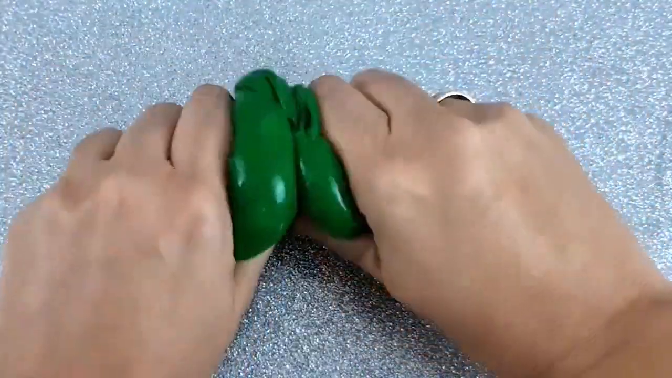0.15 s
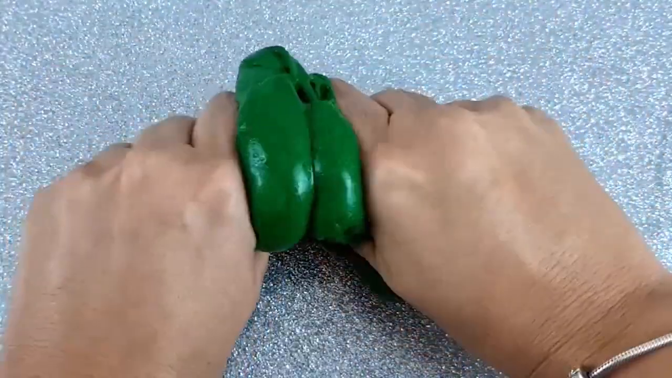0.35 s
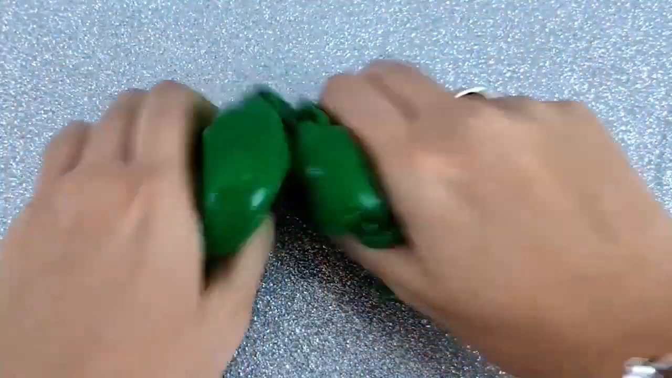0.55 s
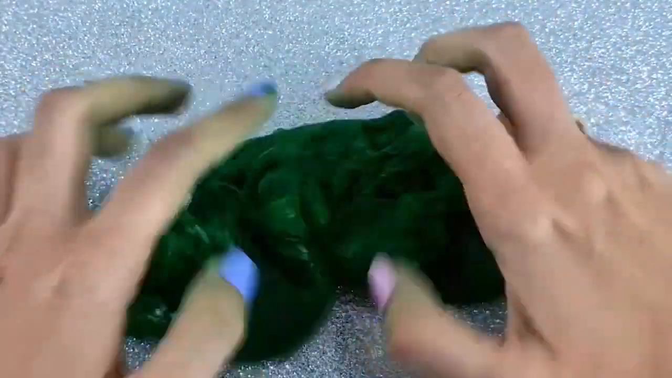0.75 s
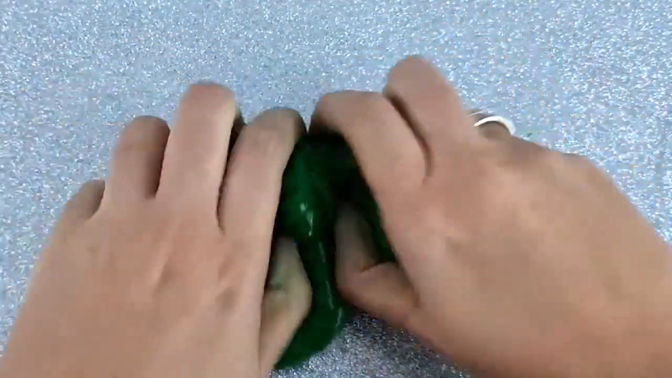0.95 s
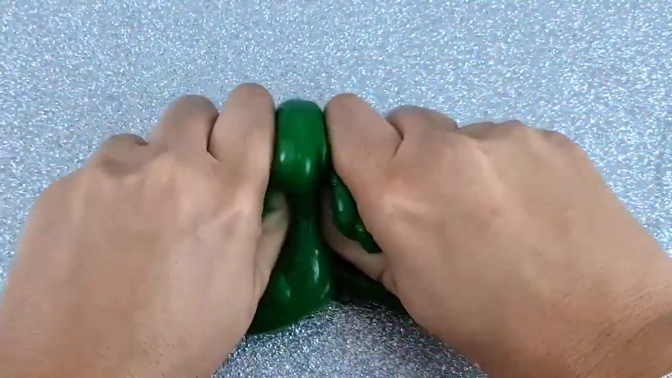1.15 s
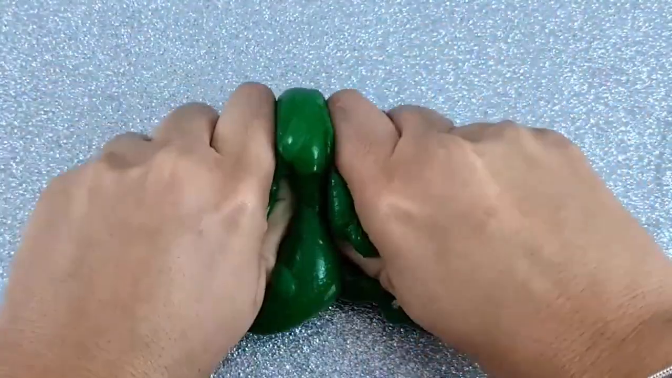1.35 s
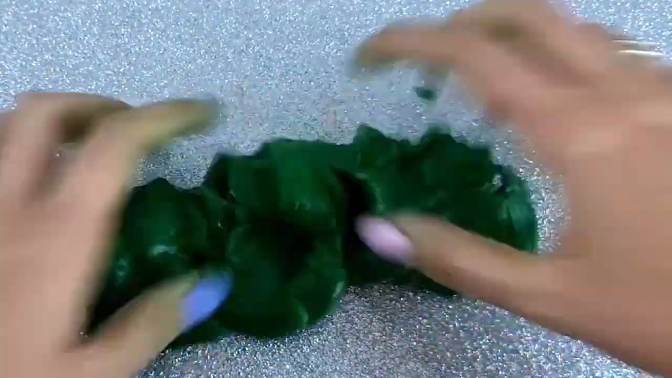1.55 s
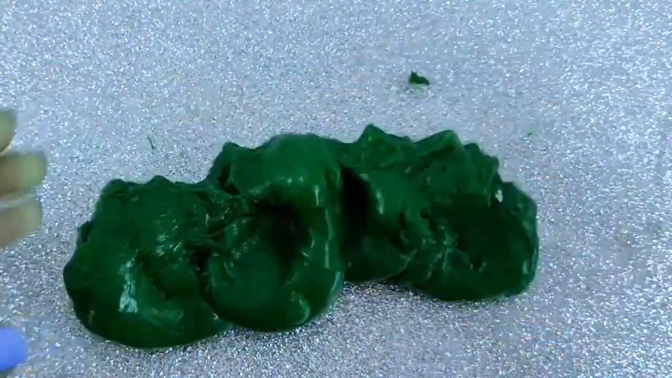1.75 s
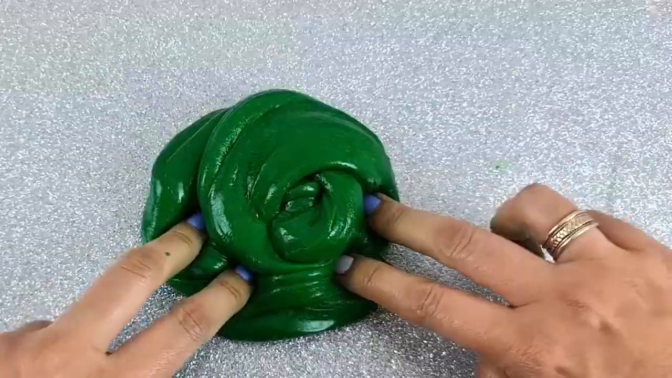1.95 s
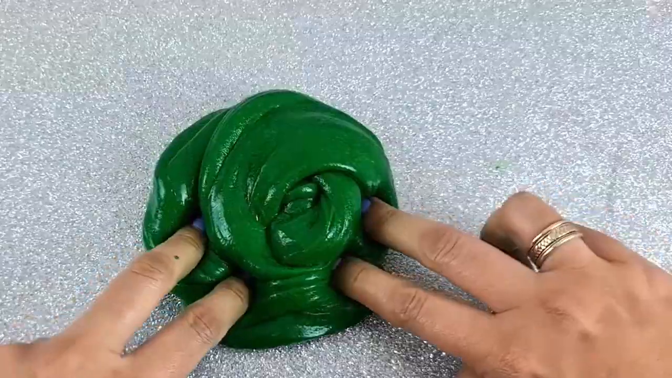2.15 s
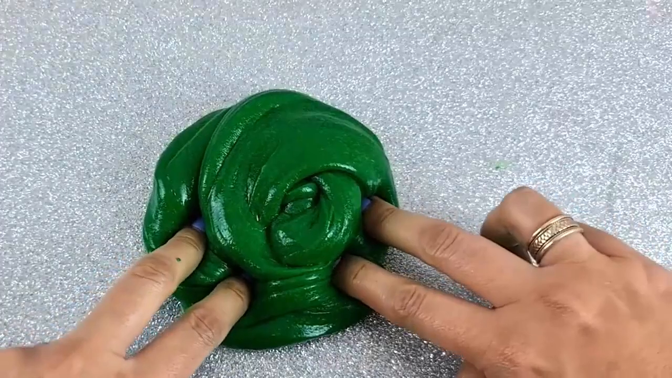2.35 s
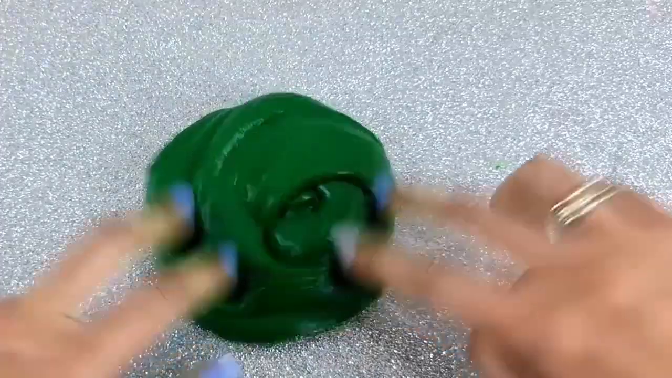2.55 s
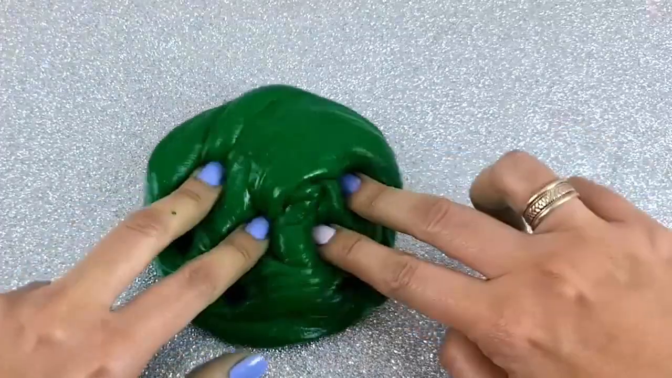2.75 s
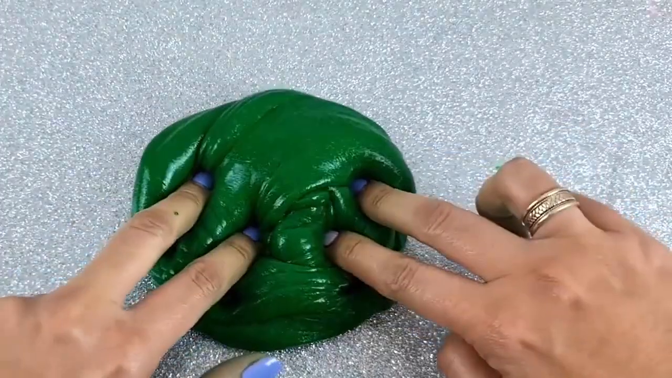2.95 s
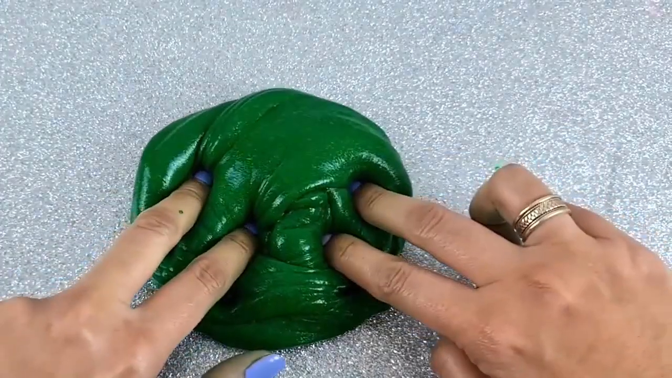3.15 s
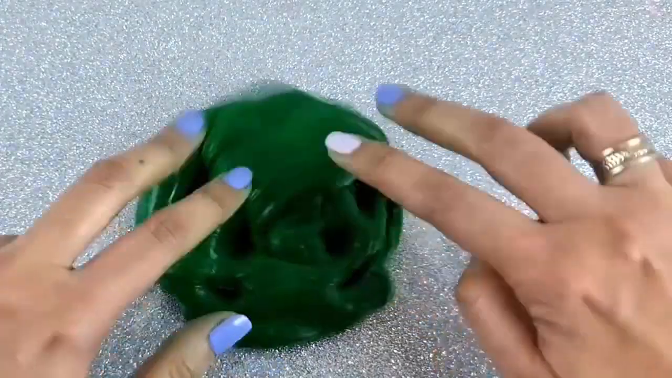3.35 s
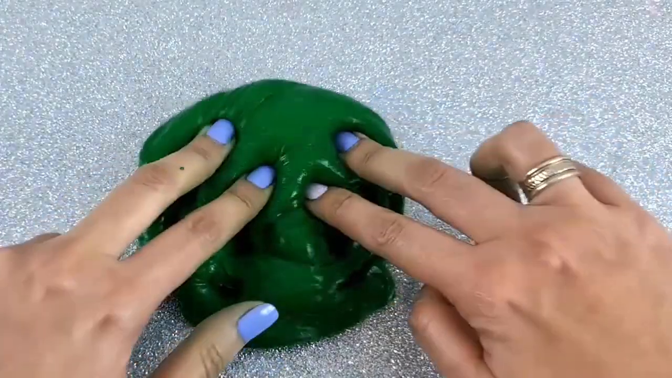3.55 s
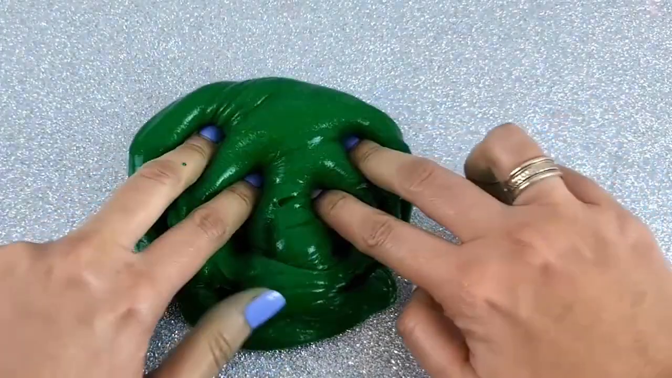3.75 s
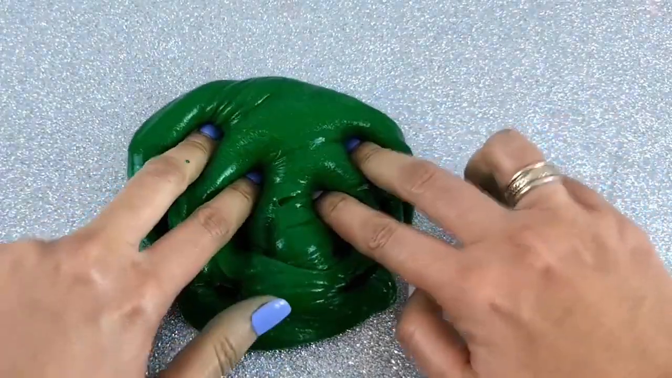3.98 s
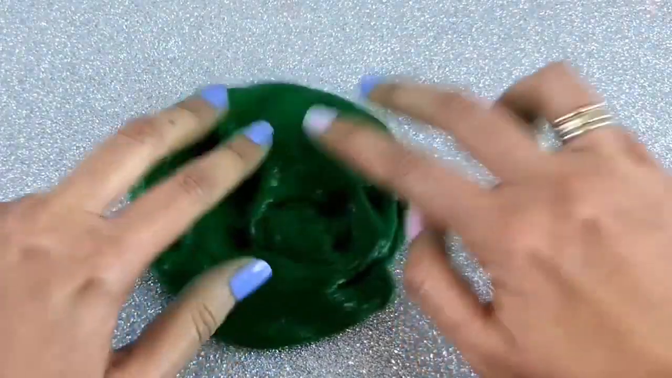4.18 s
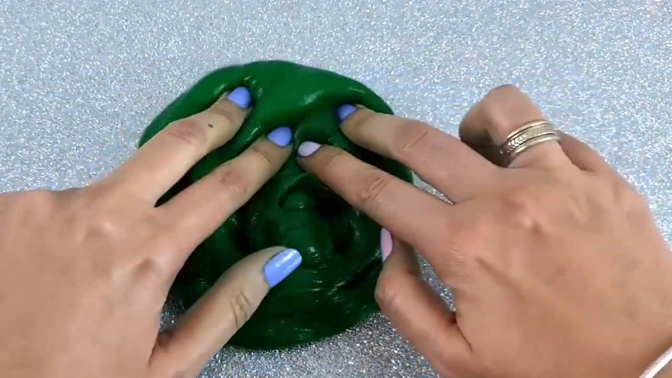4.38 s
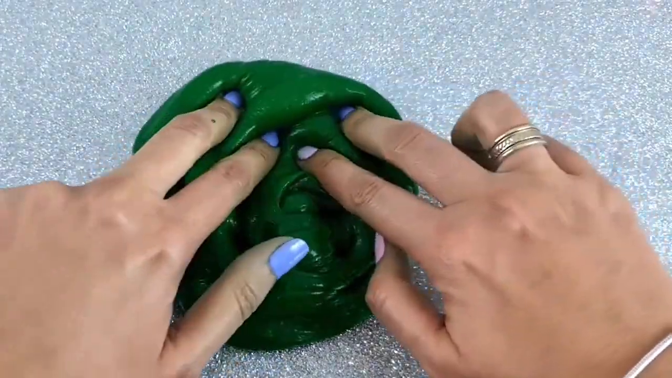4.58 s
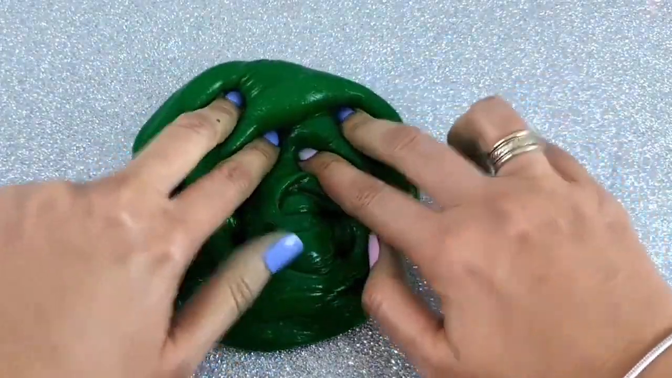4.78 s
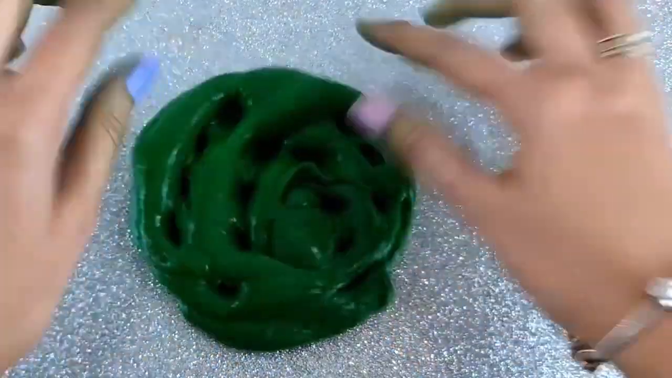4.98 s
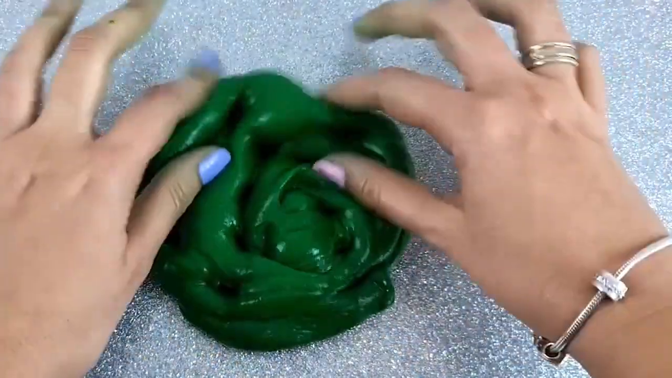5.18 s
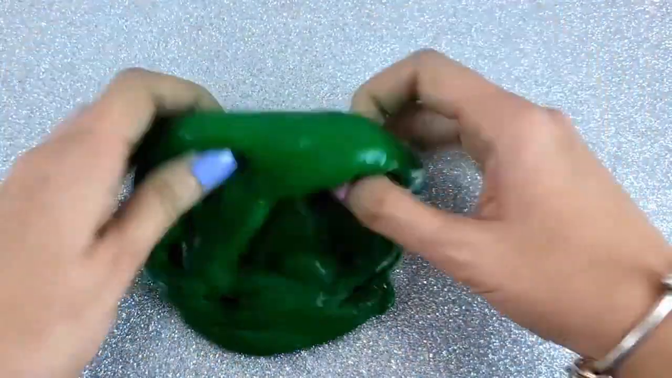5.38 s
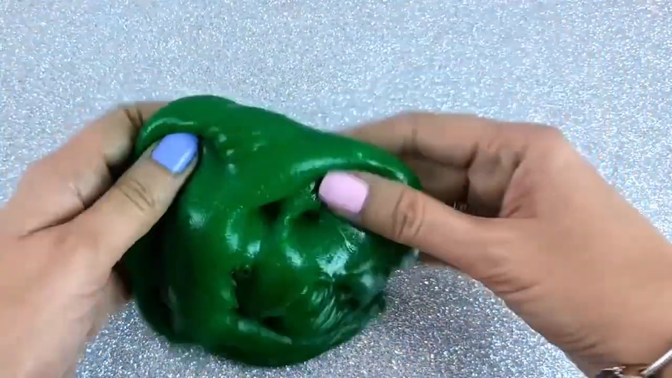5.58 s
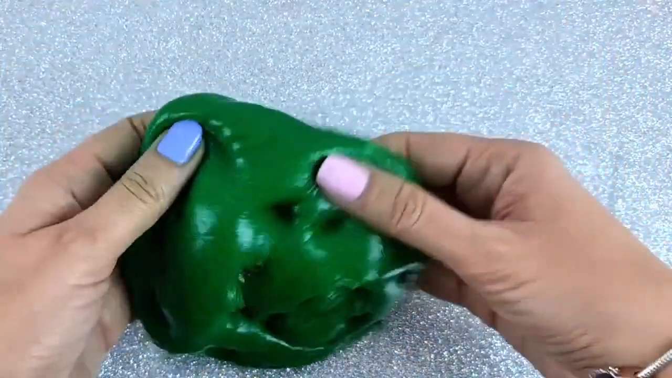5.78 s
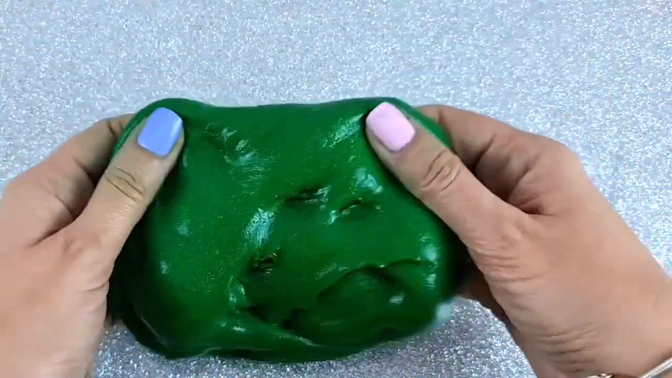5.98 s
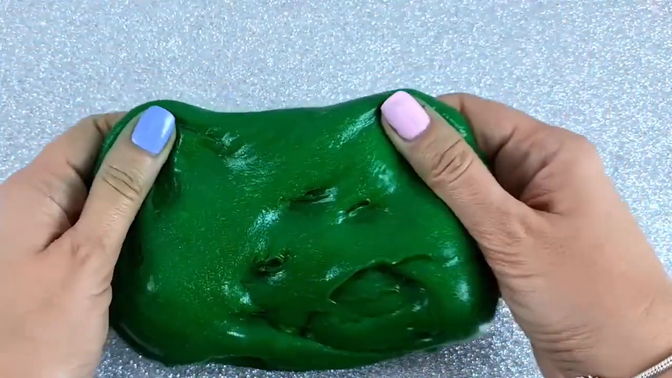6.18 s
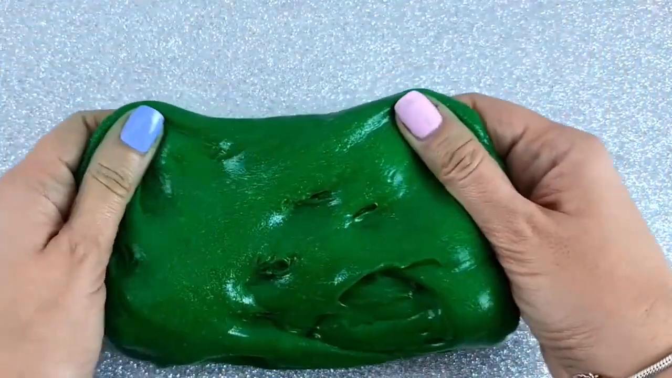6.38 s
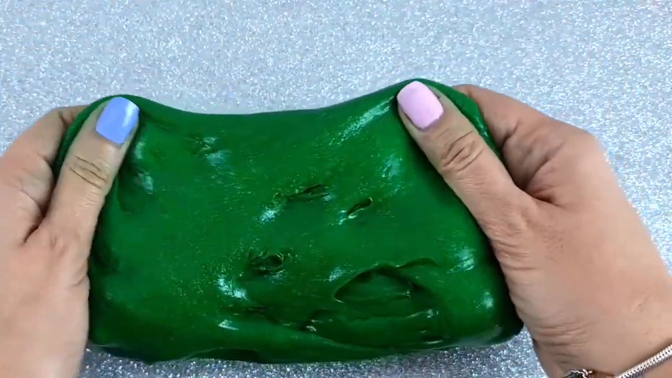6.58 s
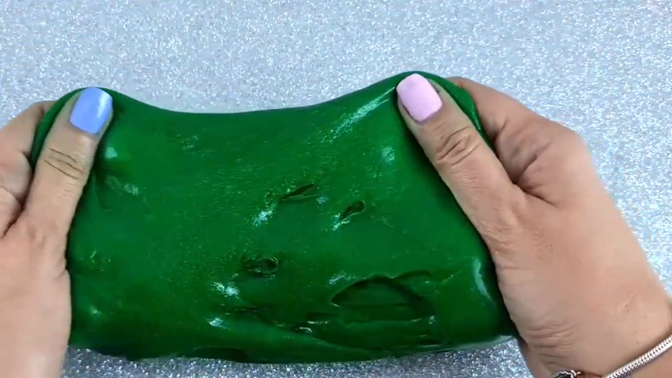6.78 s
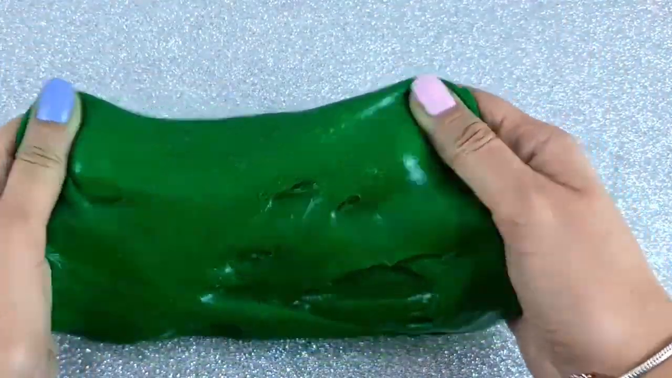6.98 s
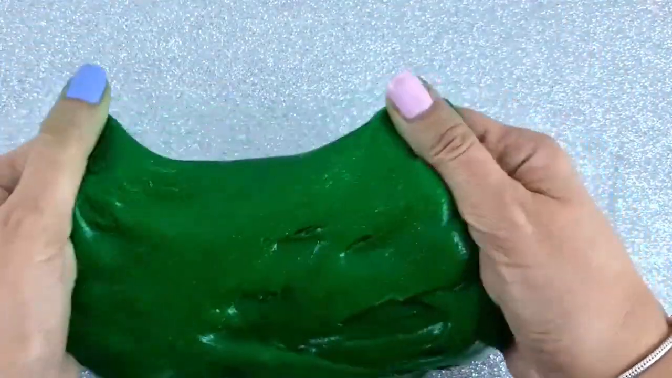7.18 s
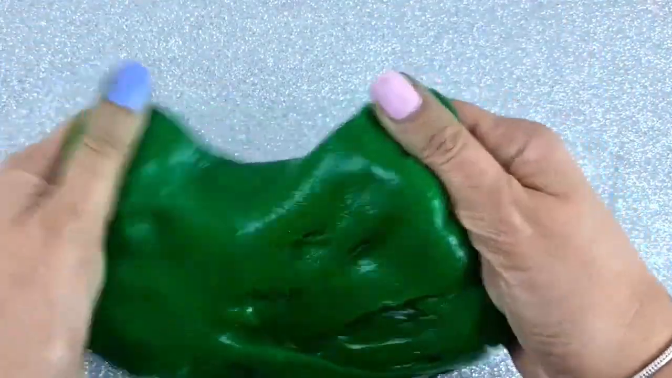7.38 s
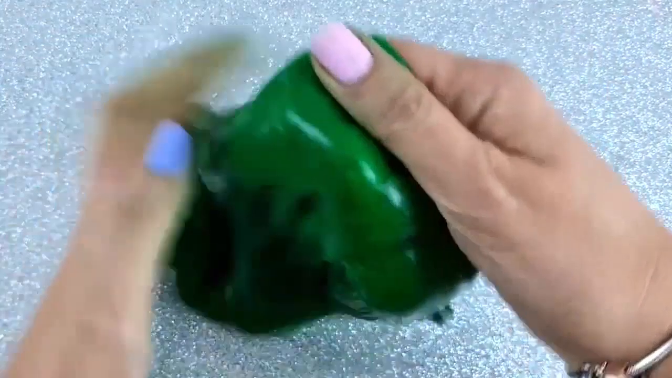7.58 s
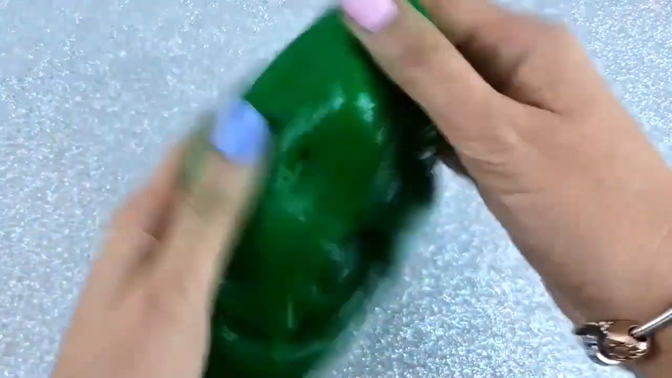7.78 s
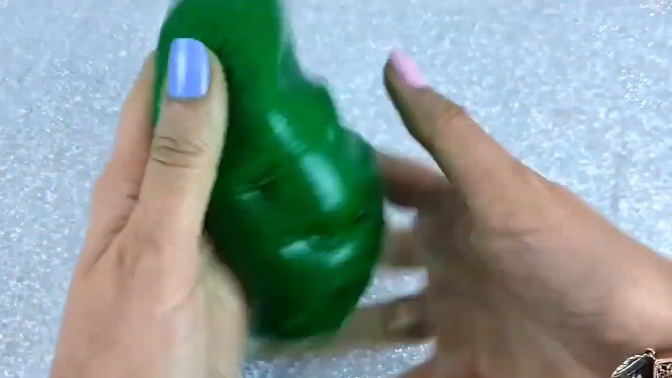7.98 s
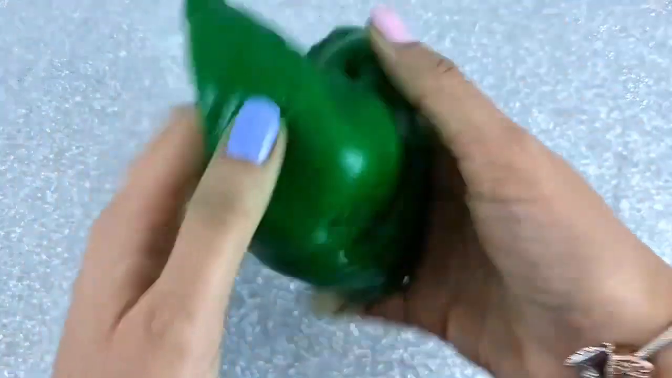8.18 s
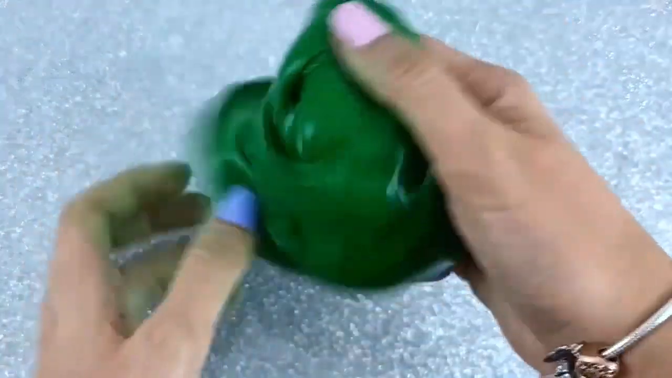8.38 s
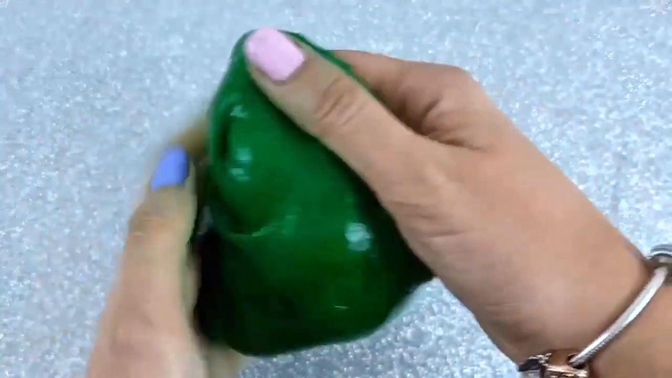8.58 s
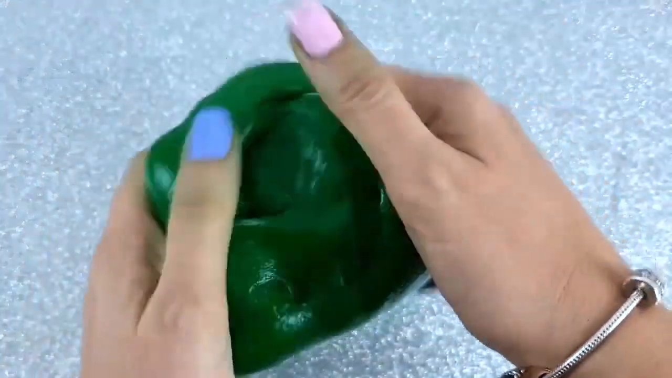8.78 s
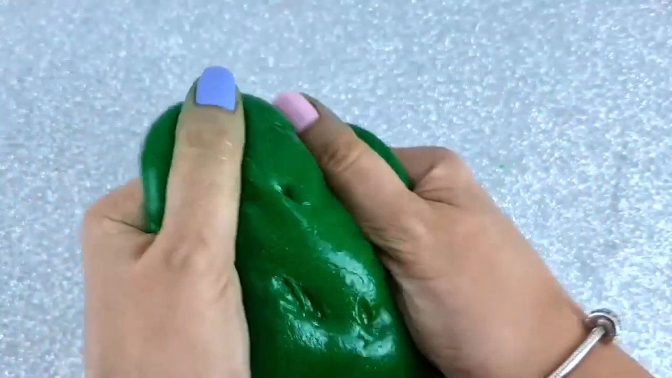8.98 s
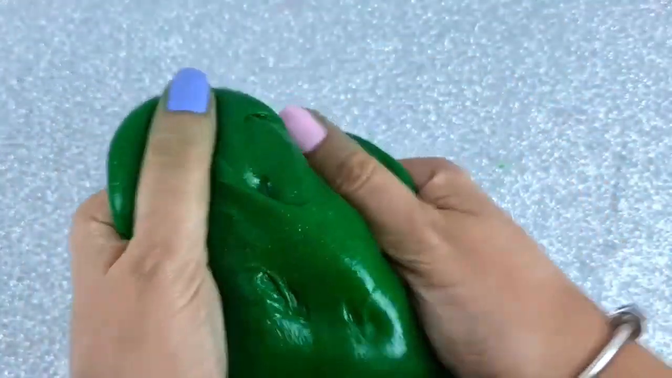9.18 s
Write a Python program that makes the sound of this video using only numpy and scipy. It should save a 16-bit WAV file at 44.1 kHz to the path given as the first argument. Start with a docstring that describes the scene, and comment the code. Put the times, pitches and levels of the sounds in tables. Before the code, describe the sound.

Air pockets snap and pop in wet slime as hands knead it on a table in a small, slightly echoing room. Dense sticky crackling gives way to single loud finger pokes with short pauses between them. A quieter stretch of fine fizzing, little bubbles and soft palm pats follows, before a final loud burst of pops. The microphone is very close, with a faint hiss underneath.

```python
"""Tiny bubbles crackle over a faint hiss as two hands squeeze, poke and stretch wet slime on a table.
Trapped air tears through the skin with a snap, and each opened pocket rings briefly as a damped
cavity resonator. Pushes thud, short hisses escape and the stretched skin sizzles. A small bare room
reverberates after every pop, and the loudest ones overload the close stereo microphone."""
import sys
import numpy as np
from scipy import signal
from scipy.fft import rfft, irfft, next_fast_len
from scipy.io import wavfile
from scipy.ndimage import uniform_filter1d

SR = 44100
rng = np.random.default_rng(int(sys.argv[2]) if len(sys.argv) > 2 else 0)


def wrap_up_sound(samples):
    """Save the sound to the file named by the first command line argument, as 16-bit audio."""
    columns = np.atleast_2d(samples).T
    # keep every value between -1 and 1, then stretch to whole-number steps
    tamed = np.clip(columns, -1, 1)
    steps = np.round(tamed * 32767).astype(np.int16)
    wavfile.write(sys.argv[1], SR, steps)


N = 407484

def undb(db):
    """Amplitude ratio of a level in decibels."""
    return 10 ** (np.asarray(db) / 20)

def seconds(length):
    """Uniformly sampled time axis."""
    return np.arange(int(length * SR)) / SR

def unit(x):
    """Normalisation to rms 1."""
    return x / np.sqrt(np.mean(x ** 2) + 1e-18)

def colour(x, curve):
    """Zero-phase filtering by (f/Hz, gain/dB) points on a log-frequency axis."""
    size = next_fast_len(x.shape[-1] + 2048)
    hz, db = np.transpose(curve)
    gain = undb(np.interp(np.log(np.fft.rfftfreq(size, 1 / SR) + 1), np.log(hz), db))
    return irfft(rfft(x, size) * gain, size)[..., :x.shape[-1]]

def band(x, hz, width):
    """Two-pole resonance with Q = 1 / width."""
    w = 2 * np.pi * min(hz / SR, .45)
    a = np.sin(w) * width / 2
    return signal.lfilter([a, 0, -a], [1 + a, -2 * np.cos(w), 1 - a], x)

def add(out, s, sound, side, port_lag_ms=.13, pan_db=3.5):
    """Path difference: a sound off centre reaches one microphone port earlier and louder."""
    for port, sign in enumerate((1, -1)):
        start = max(int((s - sign * side * port_lag_ms / 2000) * SR), 0)
        part = (sound[port] if sound.ndim == 2 else sound)[:max(N - start, 0)]
        out[port, start:start + len(part)] += part * undb(sign * side * pan_db / 2)

def effort(pushes, build_db=4, relax_s=.0059):
    """Power summation of envelopes: each push takes hold, builds to its level and relaxes."""
    t, power = np.arange(N) / SR, np.zeros(N)
    for s, length, db in pushes:
        near = slice(max(int((s - .2) * SR), 0), int((s + length + .4) * SR))
        age = t[near] - s
        grip_s = .0022 + .067 * length
        build = undb(db - build_db * (1 - np.clip(age / length, 0, 1)))
        edges = np.exp(np.minimum(age, 0) / grip_s - np.maximum(age - length, 0) / relax_s)
        power[near] += (build * edges) ** 2
    return np.sqrt(power)

# Noise spectrum of the quiet room: f/Hz, relative density level/dB
AIR_SPECTRUM = [(25, -9), (70, 0), (115, -0.5), (190, -14), (400, -13), (1000, -16.5), (3000, -20),
                (7500, -20), (10000, -27.5), (13000, -26)]
def still_air():
    """Ambient noise: faint rumble and hiss, partly coherent between the ports."""
    noise = rng.standard_normal((3, N))
    return unit(colour(noise[0] + noise[1:], AIR_SPECTRUM)) * undb(-61)

def bubbles(per_s, hz, octaves, cycles, scatter_db):
    """Shot noise: random bursts excite seven resonances, and the swarm's level is partly evened out."""
    out = np.zeros((2, N))
    for step in np.linspace(-1, 1, 7):
        when, strength, polarity, place = rng.random((5000, 4))[:int(per_s * N / SR / 7)].T
        size = undb(-scatter_db * np.log(.02 + strength)) * np.sign(polarity - .5)
        start = (when * (N - 16)).astype(int) + 8
        lag = (place * 9).astype(int) - 4
        bursts = np.array([np.bincount(start + sign * lag, size, N) for sign in (1, -1)])
        pitch = hz * 2 ** (step * octaves)
        out += band(bursts, pitch, 1 / (np.pi * cycles)) * np.exp(-step ** 2) / np.sqrt(pitch)
    power = uniform_filter1d(np.mean(out ** 2, axis=0), size=1500)
    return .45 * out / np.sqrt(power + .44 * power.mean())

# Squeezes and pulls of the lump: t/s, duration/s, squelch level/dB, fizz level/dB
KNEADS = [(0.02, 0.18, -42, -45.5), (0.211, 0.087, -29, -30.5), (0.303, 0.015, -12.5, -12),
          (0.334, 0.046, -17, -14.5), (0.411, 0.024, -19, -15), (0.469, 0.024, -20, -23),
          (0.637, 0.061, -27.5, -35.5), (0.713, 0.066, -32, -35), (0.995, 0.021, -40.5, -45),
          (1.077, 0.058, -46.5, -41.5), (1.169, 0.088, -31.5, -30.5), (1.32, 0.034, -28.5, -23.5),
          (1.35, 0.053, -31, -24.5), (1.586, 0.063, -24, -28), (2.0, 0.16, -65.5, -56),
          (2.664, 0.013, -22.5, -15.5), (3.437, 0.015, -10, -17), (4.215, 0.03, -20.5, -20.5),
          (4.991, 0.02, -14.5, -11), (5.341, 0.11, -53, -46), (5.468, 0.12, -45.5, -58),
          (6.966, 0.028, -53, -42), (7.03, 0.24, -55, -48), (7.339, 0.048, -46, -39.5),
          (7.55, 0.04, -30.5, -26.5), (7.76, 0.253, -49.5, -49), (7.832, 0.04, -39.5, -42.5),
          (8.075, 0.02, -31.5, -40.5), (8.217, 0.548, -50, -56.5), (9.052, 0.1, -31, -39.5),
          (9.115, 0.026, -25, -12.5), (9.184, 0.04, -28, -23)]
def crackle():
    """Impulse excitation: kneading bursts mid-sized bubbles (squelch) and fine sticky threads (fizz)."""
    s, length, squelch_db, fizz_db = np.transpose(KNEADS)
    squelch = bubbles(per_s=600, hz=1450, octaves=1, cycles=1.5, scatter_db=3.5)
    squelch = colour(squelch, [(200, -20.5), (550, 3), (1100, -3.5), (2500, -2), (8000, -4.5)])
    fizz = bubbles(per_s=2000, hz=5800, octaves=.97, cycles=.7, scatter_db=-1)
    fizz = colour(fizz, [(1000, -3.5), (3000, 3.5), (8000, -1), (12000, 2)])
    return squelch * effort(zip(s, length, squelch_db)) + fizz * effort(zip(s, length, fizz_db))

def cavity(hz, cycles, glide=.12, opening=.04):
    """Damped resonance: a pocket rises in pitch as its mouth widens; longer rings open more gently."""
    periods = seconds(6 * cycles / hz) * hz
    phase = periods * (1 + glide * (.5 - np.exp(-periods / cycles / 2)))
    envelope = np.exp(-periods / cycles) * (1 - np.exp(-periods / (opening * cycles ** 2)))
    return np.sin(2 * np.pi * phase) * envelope / envelope.max()

# Bass loss of a small source: f/Hz, gain/dB
BASS_LOSS = [(90, -25.5), (250, -9.5), (480, -1.5)]
def radiate(x):
    """Radiation efficiency: a source much smaller than the wavelength gives off little sound."""
    return colour(x, BASS_LOSS)

# Air forced through a fold: t/s, duration/s, level/dB, median f/Hz
BUBBLE_STRINGS = [(0.026, 0.049, -48, 1360), (0.083, 0.085, -46, 1530), (.19, .12, -37.5, 1610),
                  (.61, .04, -37.5, 1590), (0.641, 0.075, -42.5, 1550), (1.365, .05, -41.5, 577),
                  (1.585, 0.091, -38, 1400), (5.344, 0.054, -50.5, 1110), (7.845, .05, -46.5, 1940),
                  (8.336, 0.045, -56, 2190)]
def gurgles(per_s=220, spread_octaves=.32, scatter_db=3.5):
    """Cavity resonance in series: like-sized bubbles follow unevenly in a string that swells and fades."""
    out = np.zeros((2, N))
    for s, length, db, hz in BUBBLE_STRINGS:
        count = int(length * per_s)
        side = rng.uniform(-1, 1)
        for k, (late, pitch, size) in enumerate(rng.standard_normal((64, 3))[:count]):
            progress = np.clip((k + .5 + late / 2) / count, 0, 1)
            bubble = cavity(hz * 2 ** (spread_octaves * pitch), cycles=.8)
            bubble /= np.sqrt(np.sum(bubble ** 2) * per_s / SR)
            gain = np.sin(np.pi * progress) * undb(db + scatter_db * size)
            add(out, s + progress * length, bubble * gain, side)
    return radiate(out)

def noise_bursts(events, width):
    """Transient noise: each band-limited burst swells and dies, partly coherent between the ports."""
    out, t = np.zeros((2, N)), seconds(.15)
    for s, db, hz, ms in events:
        noise = rng.standard_normal((3, len(t)))
        age = t / (ms / 3000)  # the swell peaks a third of the way through
        swell = age * np.exp(1 - age)
        burst = (noise[0] + .83 * noise[1:]) * swell
        spit = unit(band(band(burst, hz, width), hz, width))
        add(out, s, spit * np.sqrt(np.mean(swell ** 2)) * undb(db - 2), rng.uniform(-1, 1))
    return out

# Sticky threads breaking: t/s, level/dB, centre f/Hz
THREAD_BREAKS = [(.094, -30.5, 4540), (0.305, -1.5, 10900), (0.4202, -9.5, 5800), (.479, -16.5, 11000),
                 (1.342, -11, 9500), (1.561, -26.5, 5670), (2.299, -40, 3000), (2.6626, -21, 5000),
                 (3.146, -40.5, 10950), (3.858, -38, 9300), (5.6212, -42, 4970), (6.6836, -32, 6300),
                 (6.8035, -27.5, 5480), (7.212, -33.5, 6000), (7.2426, -29.5, 6300), (7.554, -31, 4470),
                 (7.721, -32, 9860), (8.085, -30, 4100), (8.1598, -32.5, 3600), (8.893, -29, 8960),
                 (9.0845, -22.5, 3970), (9.1028, -7.5, 8600)]
def ticks(ms=1.5):
    """Sudden release of tension: a thread snaps off the skin with a brief burst of noise."""
    return noise_bursts([(s, db, hz, ms) for s, db, hz in THREAD_BREAKS], width=.91)

# Small bubbles that open without a snap: t/s, level/dB, f/Hz, relative ring length
SMALL_POCKETS = [(0.2604, -22, 1390, 2.7), (0.2838, -20, 1400, 3.3), (0.67, -22.5, 1270, 2.8),
                 (0.743, -32.5, 1480, 6.7), (1.238, -28, 850, 2.9), (1.305, -21.5, 1440, 1.8),
                 (1.5224, -27.5, 1130, 1.5), (1.648, -20, 1200, 3.5), (2.111, -47.5, 1290, 2.6),
                 (2.2974, -33.5, 1090, 1.98), (3.7385, -29, 901, 2.2), (3.7985, -25.5, 764, 2.7),
                 (4.2113, -18.5, 661, 3.4), (5.789, -44.5, 905, 4.4), (6.423, -48.5, 1176, 3),
                 (7.027, -45, 2547, 4), (7.169, -44, 1164, 3.1), (7.5738, -21.5, 1385, 3.7),
                 (7.645, -29.5, 2660, 5), (7.808, -34, 2260, 3.6), (7.8412, -32, 1060, 5),
                 (7.934, -28, 1170, 2.3), (7.997, -27, 1120, 3.8), (7.997, -28, 2590, 3.8),
                 (8.081, -28.5, 1020, 2.7), (8.28, -34, 2090, 5), (8.7125, -27.5, 1080, 3.7),
                 (9.153, -19.5, 1681, 28)]
# Large pockets that burst: t/s, ring level/dB, f/Hz, relative ring length, snap level/dB
LARGE_POCKETS = [(.303, -4.5, 555, 1.1, -14), (0.3702, 5.5, 1250, 1.5, -17.5),
                 (.372, 0.5, 637.5, 1.8, -20.5), (.39, 0.5, 1010, 1.1, -19), (1.152, -18, 1885, .6, -26.5),
                 (1.324, -14.5, 1830, .9, -27.5), (1.6681, -3.5, 926, 2.4, -29.5),
                 (2.673, 3.5, 1366, 1.3, -7), (2.6776, -0.5, 1158, .9, -4), (2.68, -0.5, 475, 1.3, -15),
                 (2.691, -3.5, 881, 1.8, -32), (3.4378, -1.5, 750, 1.6, -22), (3.442, 1.5, 1200, 1.1, -4),
                 (3.446, -2.5, 792, 1.28, -10), (3.4489, 5.5, 610, 1.3, -8.5),
                 (3.4573, 5, 680, 0.88, -13.5), (4.2214, 0, 876, 2.2, 0.5), (4.2257, 4, 550, 1.2, -5.5),
                 (4.2376, 6.5, 570, 1.5, -4.5), (4.9891, -14.5, 1958, 1, -6), (5.012, 2, 849, 1.02, -15.5),
                 (5.429, -22, 483, .9, -33.5), (7.3855, -18, 964, 1.8, -17.5),
                 (7.395, -11.5, 1206, 1.1, -13), (9.058, -11, 766, 1.7, -53.5), (9.0694, -13, 1000, 1, -50),
                 (9.1207, 5, 1050, .6, -2.5), (9.1938, 8, 1100, .54, -6)]
def pops(flutter=.2, ring_lag_s=.0007):
    """Cavity resonance: each pocket rings at its own pitch, amplitude-modulated by its wet rim."""
    out = np.zeros((2, N))
    # the skin tears first, then the large pocket rings
    pockets = [(s + ring_lag_s, db, hz, length) for s, db, hz, length, _ in LARGE_POCKETS]
    pockets += SMALL_POCKETS
    for (s, db, hz, length), side in zip(pockets, rng.uniform(-1, 1, len(pockets))):
        ring = cavity(hz, cycles=max(.73 * length, .5))
        rim = unit(band(rng.standard_normal(SR // 10), hz / 2, 2.3))[:len(ring)]
        add(out, s, undb(db - 1.5) * ring[:len(rim)] * (1 + flutter * rim), side, port_lag_ms=.18)
    return radiate(out)

def snaps(hz=5600, ms=2.6):
    """Membrane rupture: the skin over each large pocket tears and a turbulent jet of air escapes."""
    return noise_bursts([(s, db, hz, ms) for s, *_, db in LARGE_POCKETS], width=2.5)

# Air pushed at the microphone: t/s, duration/s, level/dB
DRAUGHTS = [(.368, 0.0088, -37), (2.69, .05, -43.5), (6.87, 0.3, -58.5), (7.28, 0.426, -51.5),
            (9.19, 0.0093, -33)]
def wafts(hz=47, width=1.2):
    """Air displacement: the moving hands and the sagging sheet of slime make a low rumble."""
    noise = rng.standard_normal((2, N))
    return unit(band(band(noise, hz, width), hz, width)) * effort(DRAUGHTS)

# Palms rubbing and patting the lump: t/s, duration/s, level/dB
PALM_STROKES = [(.77, 0.074, -43.5), (1.15, 0.31, -55), (1.54, 0.063, -39), (5.43, 0.084, -39),
                (5.72, 0.25, -56.5), (6.6, 0.34, -58), (7.54, 0.153, -48), (8.075, 0.065, -37),
                (8.2, 0.48, -45)]
def patter():
    """Shot noise: the palms excite low, quickly damped resonances in a dull patter."""
    swarm = bubbles(per_s=480, hz=370, octaves=.75, cycles=1.83, scatter_db=6)
    return colour(swarm, [(700, 4), (3000, -13.5)]) * effort(PALM_STROKES)

# Fingers pushing the lump against table or palm: t/s, level/dB, f/Hz
POKES = [(0.822, -24.5, 408), (1.003, -29, 370), (1.107, -30.5, 280), (2.68, -9.5, 380), (3.445, -9, 150),
         (3.451, -10, 330), (4.225, -5, 205), (5.013, -23, 250), (5.431, -16, 296), (7.645, -28.5, 332),
         (8.084, -26, 427), (8.57, -21.5, 282), (9.195, -22.5, 150)]
def thuds():
    """Heavy damping: the soft lump absorbs each push within about a cycle."""
    out = np.zeros((2, N))
    for s, db, hz in POKES:
        add(out, s, undb(db) * cavity(hz, cycles), side=0) if (cycles := .59) else None
    return colour(out, [(40, -8.5), (140, -2)])

# Short hisses and one patch of high crackle: t/s, level/dB, centre f/Hz, duration/ms
HISS_BURSTS = [(1.153, -18, 4240, 2.5), (1.424, -20.5, 4300, 6.4), (2.666, -21, 2780, 26),
               (3.441, -16.5, 3080, 24), (4.2125, -38, 2380, 17), (4.9902, -5.5, 3280, 1.07),
               (6.02, -50, 11400, 66), (6.801, -35.5, 6060, 41), (6.85, -35, 6260, 18),
               (7.389, -27.5, 5360, 15)]
def hisses():
    """Narrow-band noise: short hisses and a patch of fine, high crackle."""
    return noise_bursts(HISS_BURSTS, width=.6)

# The lump drawn out into a sheet: t/s, duration/s, level/dB
PULLS = [(5.35, 0.29, -59), (6.02, 0.041, -54.5), (6.2, 0.11, -54.5), (6.4, 0.34, -59), (6.93, 0.32, -48),
         (8.5, 0.28, -67)]
def sizzle():
    """Tensile rupture: hundreds of hair-thin threads a second part on the stretched skin."""
    threads = bubbles(per_s=420, hz=6500, octaves=1.1, cycles=1.1, scatter_db=4)
    return colour(threads, [(1500, -3.5), (4000, -5.5), (7500, 6.5), (12000, 6.5)]) * effort(PULLS)

# Reverberation by band: f/Hz, T60/s, level/dB
DECAY_BANDS = [(100, 0.28, -1), (260, 0.4, -1.5), (600, 0.4, -0.5), (1000, .39, 0.2), (1840, 0.43, 0.5),
               (4750, 0.42, -2), (8000, .35, -2.5), (14000, 0.36, -1.5)]
def reflections(t, first_s=.00016, build_s=.0012):
    """Diffuse field: dense reflections build up, then decay exponentially at each band's own rate."""
    hz = np.fft.rfftfreq(len(t), 1 / SR)
    mid, side = rfft(rng.standard_normal((2, len(t))))
    apart = np.minimum(hz / 700, 1)  # long waves reach both ports alike
    field = (mid + np.array([[1], [-1]]) * apart * side) / np.sqrt(1 + apart ** 2)
    centres = np.transpose(DECAY_BANDS)[0]
    tail = np.zeros((2, len(t)))
    for selector, (_, t60, db) in zip(np.eye(len(centres)), DECAY_BANDS):
        weight = np.interp(np.log(hz + 1), np.log(centres), selector)
        tail += irfft(field * weight, len(t)) * undb(db - 60 * t / t60)
    tail *= 1 - np.exp(-np.maximum(t - first_s, 0) / build_s)
    return unit(tail) / np.sqrt(len(t))

# Standing waves between the walls: f/Hz, T60/s, level/dB
STANDING_WAVES = [(137.5, 0.57, 0), (183.5, 0.53, -6.5), (274, 0.33, -2.5), (394.6, 0.21, -6),
                  (467.6, 0.26, -3), (540, 0.28, -2.5), (630, 0.24, -6.5), (894, 0.26, -11)]
def room(x):
    """Convolution with the room's impulse response: a diffuse tail over a few normal modes."""
    t = seconds(.8)
    tail = reflections(t)
    phases = rng.uniform(0, 2 * np.pi, (len(STANDING_WAVES), 1, 1))
    phases = phases + .5 * rng.standard_normal((len(STANDING_WAVES), 2, 1))  # offset at each port
    modes = sum(undb(db - 60 * t / t60) * np.sin(2 * np.pi * hz * t + phase)
                for (hz, t60, db), phase in zip(STANDING_WAVES, phases))
    response = undb(-3.5) * tail + undb(-4) * modes * 200 / SR
    return signal.fftconvolve(x, response, axes=1)[:, :N]

# Frequency response of the microphone: f/Hz, gain/dB
MIC_RESPONSE = [(30, -7), (150, -9), (1500, 4.5), (5000, 0), (7600, 2), (8800, -2), (10500, -5),
                (12500, 0.5), (15500, 0)]
def scene():
    """Superposition: direct and reverberant sound, coloured by the microphone, over the air's noise."""
    slime = pops() + snaps() + ticks() + hisses() + thuds() + crackle() + patter() + gurgles() + sizzle()
    return colour(slime + room(slime), MIC_RESPONSE) + still_air() + wafts()

def record(dry, top_hz=15750):
    """Saturation and band limiting: the loudest pops flatten against full scale; the top is cut."""
    limited = dry / (1 + dry ** 6) ** (1 / 6)
    return signal.sosfilt(signal.ellip(10, .1, 60, top_hz, fs=SR, output="sos"), limited)

dry = scene()
out = record(dry)
wrap_up_sound(out)
```